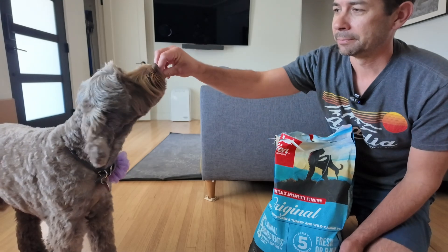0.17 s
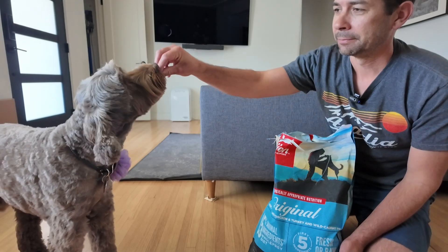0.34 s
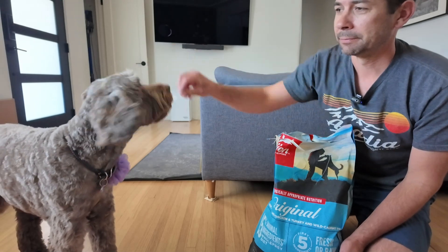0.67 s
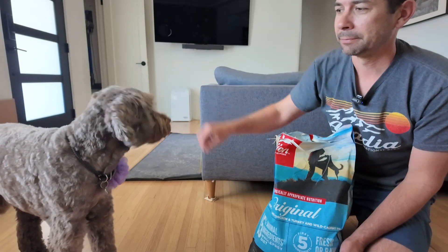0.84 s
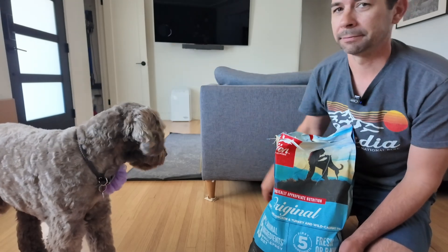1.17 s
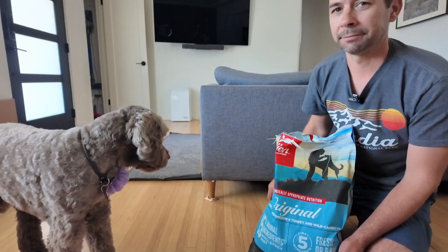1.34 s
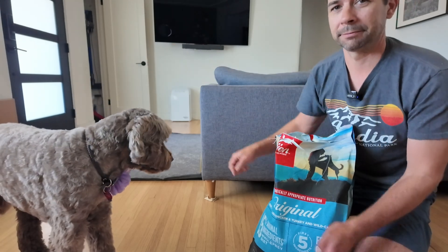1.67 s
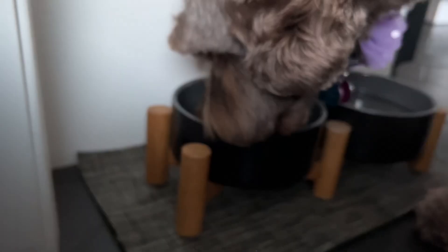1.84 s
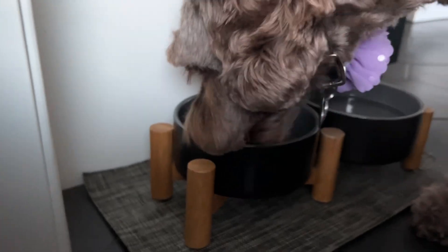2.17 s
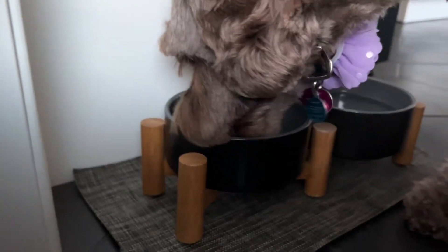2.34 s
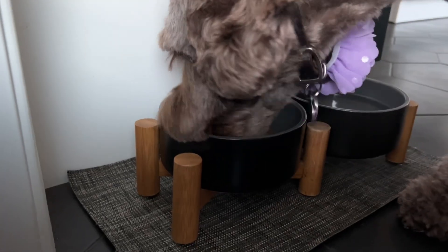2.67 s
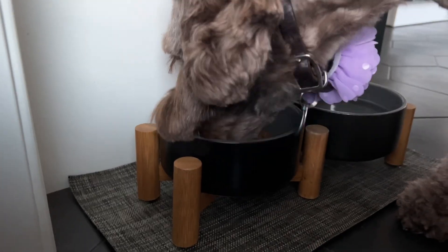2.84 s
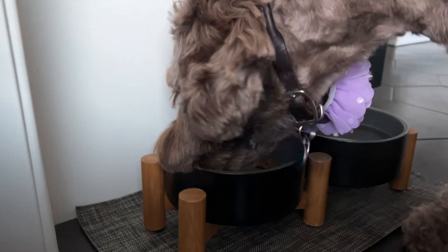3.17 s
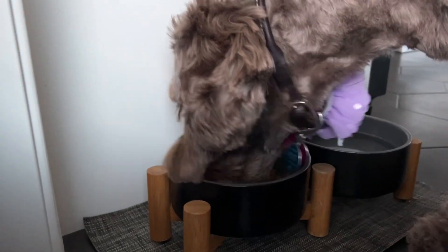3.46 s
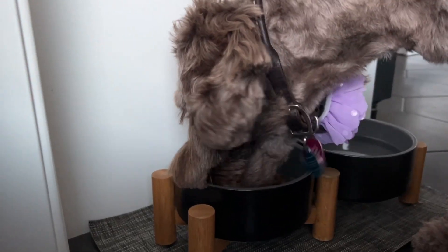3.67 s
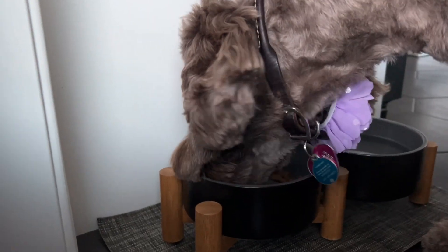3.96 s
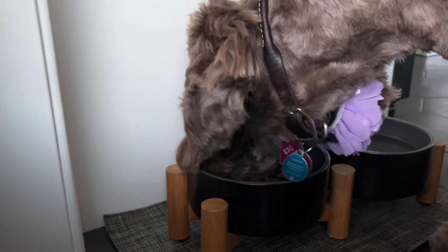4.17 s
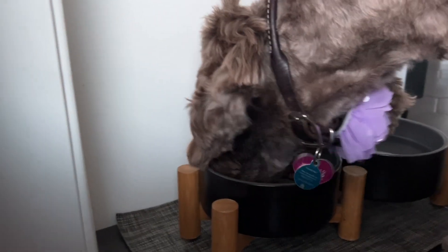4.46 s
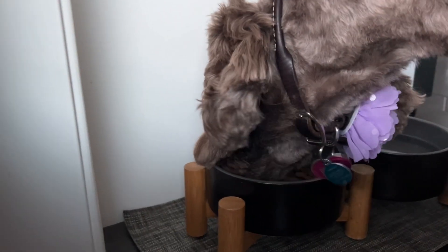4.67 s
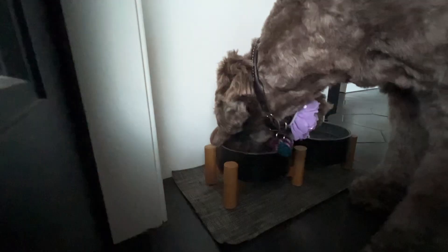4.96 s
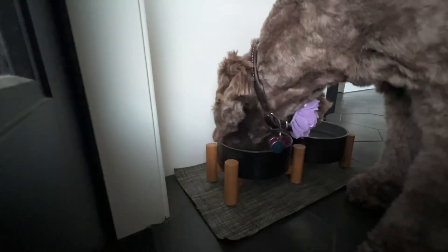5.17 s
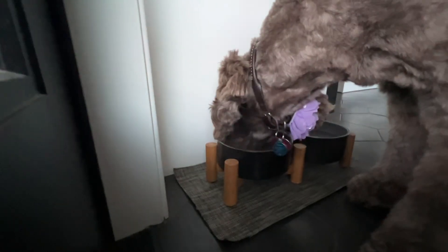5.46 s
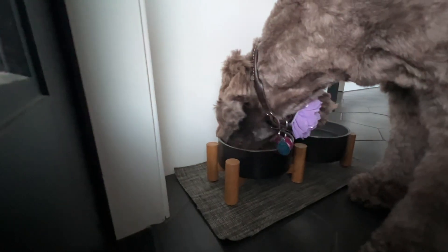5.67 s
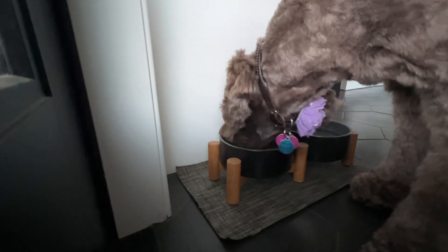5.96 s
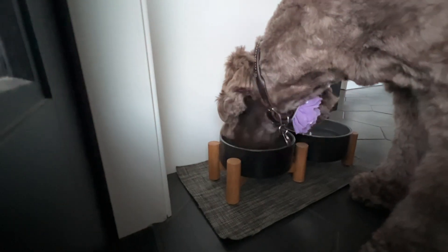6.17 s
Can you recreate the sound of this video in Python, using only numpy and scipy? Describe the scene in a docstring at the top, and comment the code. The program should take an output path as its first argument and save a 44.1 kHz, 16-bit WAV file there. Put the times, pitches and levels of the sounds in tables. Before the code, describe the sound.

A quiet living room in mono: soft ventilation, low hum, a slowly rising hiss and faint kibble cracks from a hand-fed dog. A small wooden knock, a brief dip, then a close stereo view of a bowl. Its stand bumps, kibble rustles and crunches, and metal tags clink brightly on the rim, densest in the middle, sparser later over a low wavering drone.

```python
"""In a quiet living room, in mono, a dog cracks a piece of kibble from a hand over ventilation, hum and hiss.
A wooden knock follows, the sound dips briefly, and a two-port microphone then hears a bowl on its stand close by.
There metal collar tags clink, chatter and slide on the rim: contact noise wakes decaying metal modes.
Kibble cracks in bursts of splinters and rustles under the muzzle; the stand is bumped as damped wood modes.
Below lie an indoor rumble of shaped noise and, from about three fifths of the way on, a wavering two-tone drone."""
import sys
import numpy as np
from scipy import signal
from scipy.fft import rfft, irfft
from scipy.io import wavfile
from scipy.ndimage import uniform_filter1d

SR = 44100
rng = np.random.default_rng(int(sys.argv[2]) if len(sys.argv) > 2 else 0)


def unload_audio(sound):
    """Save the sound as a 16-bit wav file, at the path given as the first command line argument."""
    columns = np.transpose(np.atleast_2d(sound))
    # keep every value between -1 and 1, then stretch to whole-number steps
    steps = np.round(np.clip(columns, -1, 1) * 32767)
    wavfile.write(sys.argv[1], SR, steps.astype(np.int16))


N = 277962
T = np.arange(N) / SR
FREQS = np.fft.rfftfreq(N, 1 / SR)

# All levels are relative: each layer sets its own gain on top.
# tags strike: [t/s, force/dB, squareness on the rim/0-1, squareness on the other tag/0-1, contact tick/dB]
TAG_STRIKES = [(2.17, -35.5, 0.26, 0.76, -27), (2.313, -48, .1, .3, -46), (2.32, -48, 0, 0.6, -36),
               (2.4757, -49, .16, .1, -43), (2.513, -67, .6, 0, -54), (2.534, -34.5, 0.62, 0, -24),
               (2.616, -45.5, .1, 0.81, -30), (2.734, -57, .1, 0, -39), (2.751, -47, .12, 0.77, -35),
               (2.8194, -31, 0, 0.78, -20), (2.828, -31, 0.3, 0.1, -29), (2.96, -31, 0.2, 0.71, -26),
               (3.128, -24.5, 0.1, 0, -25), (3.161, -54, 0, 0, -48), (3.203, -51, 0, 0, -39),
               (3.29, -40, .1, 0.73, -30), (3.315, -22.5, 0, 0.68, -27.5), (3.4275, -16.5, 0.1, 0.5, -21.5),
               (3.439, -30, .08, 0.8, -25.5), (3.6026, -37.5, 0.56, 0.68, -27.5),
               (3.627, -57, .2, 0.7, -46), (3.6745, -43, .16, 0.64, -52), (3.74, -43.5, .11, 0.02, -51),
               (3.78, -45, 0.3, 0.79, -42), (3.847, -35, 0.75, 0.4, -36), (3.862, -40.5, 0.63, 0.2, -36),
               (4.0297, -24, 0.4, 0.47, -23), (4.065, -22.5, 0.82, .2, -21), (4.0907, -25, 0.3, .35, -28),
               (4.12, -27, .2, 0.68, -28), (4.153, -42, .2, 0.14, -35), (4.203, -32, 0.63, .05, -30),
               (4.236, -34, .13, .62, -30), (4.262, -25.5, 0.3, 0.68, -19), (4.278, -60, 0.64, .4, -36),
               (4.2946, -39.5, 0.25, 0.7, -39), (4.346, -44.5, 0.75, 0.3, -33),
               (4.395, -46.5, 0, 0.74, -44), (4.434, -55, .1, 0.7, -42), (4.481, -20, 0.34, 0, -18),
               (4.488, -28.5, 0.68, 0.2, -32), (4.6005, -19, 0.51, 0.82, -14.5),
               (4.6887, -25, 0.3, 0.83, -25), (4.7077, -23, 0.1, 0.69, -28), (4.7485, -38.5, 0, 0.7, -34),
               (4.84, -49, 0.05, .2, -48), (4.946, -57.5, 0, 0.2, -43), (4.964, -32, 0.82, .4, -15.5),
               (5.0377, -26.5, 0.75, 0.53, -16.5), (5.106, -29.5, 0.78, 0.94, -20.5),
               (5.335, -21.5, 0.72, 0, -16), (5.653, -40.5, .5, 0.2, -38), (5.661, -43.5, 1, 0.88, -37),
               (5.686, -44.5, 0.98, 0.3, -52), (5.751, -51, 0.2, .5, -46), (5.856, -50.5, .97, 0.8, -37),
               (5.871, -56.5, 0.94, .51, -50), (5.948, -59, 0.1, 0.35, -61.5),
               (6.029, -51.5, 0, 0.26, -59.5), (6.068, -38.5, 0.98, 0.12, -41),
               (6.124, -35, 0.48, 1, -27.5)]
# spectrum of the hard contact itself: [f/Hz, level/dB]
CONTACT_COLOUR = [(1000, -20), (3000, -16.5), (6000, -31), (8300, -12), (10200, -13.5), (12000, -23.5),
                  (14000, -5.5), (15400, -13), (16000, -20)]
# modes of bowl and tags, before the fur damps them: [f/Hz, level/dB, t60/s]
LOWEST_RING = [(3016, -1, .26), (3042, -8, .17), (3125, -12, .12), (3494, -18, .12)]
BOWL_RING = [(4931, -4.5, .22), (5560, -24, .12), (6368, -22, .17), (7233, -1, .27), (7962, -12, .24),
             (8350, -19, .14), (8597, -27, .18), (9033, -15, .16), (9295, -8, .16), (9930, -8, .12),
             (10008, -4, .24), (10745, -12, .14), (12935, -7, .14), (13034, -11, .15)]
TAG_BEND = [(4200, -24, .12), (4490, -18, .27)]
TAG_RING = [(6440, -30, .12), (7295, -8, .06), (7333, 0, .11), (7975, -15, .15)]
EDGE_PING = [(11350, -9, .025), (11610, -5, .035), (11717, 0, .045), (11825, -8, .06), (11960, -8, .05),
             (12441, -14, .12), (15560, -13, .03)]
# the many weak modes of tags, ring and buckle: [f/Hz, level/dB]
SHIMMER = [(3000, -11), (6000, -6), (7500, -12), (9700, -3), (10600, -10), (12200, -10.5), (13500, -11),
           (15300, -12), (16000, -22)]
# a tag slides along the rim: [t/s, length/s, level/dB, its lowest ring relative to the rest/dB]
RIM_SLIDES = [(1.967, 0.033, -52.5, -16), (2.18, 0.016, -51.5, 1), (2.215, 0.015, -55.5, 2),
              (2.267, 0.026, -56.5, -5.5), (2.467, 0.025, -56, 9), (2.509, 0.05, -42, 0.5),
              (2.572, 0.041, -58, 11.5), (2.629, 0.035, -51, 3.5), (2.319, 0.047, -69, -1),
              (2.68, 0.079, -68, -4), (2.835, 0.061, -61, 3.5), (2.884, 0.03, -50, 0.5),
              (3.486, 0.034, -44, -5.5), (3.638, 0.023, -55.5, -13), (3.787, 0.031, -52, 0),
              (3.953, 0.034, -54.5, 1), (4.2, 0.13, -54.5, 7), (5.353, .1, -68, 5), (5.473, 0.16, -57.5, 1),
              (5.65, 0.061, -45, 0), (5.745, 0.074, -59, 1), (6.072, .09, -62, 16.5),
              (6.167, 0.048, -51.5, 8), (6.225, 0.04, -63, 4)]
# low and high modes of the sliding tag, damped by the contact: [f/Hz, level/dB, t60/s]
SLIDE_LOW_MODES = [(3015, 0, .14), (3130, -5, .05), (3520, -10, .05)]
SLIDE_HIGH_MODES = [(4931, -24, .1), (5167, 0, .075), (7120, -12, .06), (7325, -16, .09), (9295, -17, .07),
                    (12440, -20, .05)]
# spectrum of the scrape on the rim and of the hiss at the bowl: [f/Hz, level/dB]
HISS_COLOUR = [(1500, -16), (3000, 26.5), (6000, 15), (9000, 15.5), (12500, 1), (16000, -3)]
# the dog cracks the piece from the hand: [t/s, level/dB, f/Hz]
BITE_CRACKS = [(.062, -63.5, 3780), (.076, -63, 3660), (.096, -57.5, 3490), (.274, -53, 3400),
               (.381, -60, 2640), (.448, -55.5, 2980), (.458, -59, 3320), (.535, -56, 2830),
               (.635, -60, 7550), (.698, -58, 7450), (.707, -56, 7400), (.816, -54, 3000),
               (.835, -55, 2840), (1.0015, -46, 3540), (1.091, -44.5, 2800), (1.138, -49.5, 2250),
               (1.177, -58, 2360), (1.354, -59, 3580), (1.379, -47.5, 2740), (1.403, -51, 2730),
               (1.541, -48.5, 1980), (1.6556, -46.5, 7500)]
# kibble crushed and shoved in the bowl: [t/s, level/dB, f/Hz]
BOWL_CRUNCHES = [(2.093, -51, 2400), (2.141, -37.5, 2150), (2.227, -47, 2950), (2.433, -43, 1020),
                 (2.642, -46, 1050), (3.063, -46, 864), (3.177, -40, 2610), (3.446, -44.5, 2600),
                 (3.545, -51, 1740), (3.746, -49, 1130), (4.19, -40, 820), (5.484, -46.5, 3020),
                 (5.684, -38.5, 3320), (6.174, -35.5, 2870)]
# dull knocks on wood: [t/s, clack/dB, thud/dB, brightness/dB per octave, highest excited f/Hz]
WOOD_KNOCKS = [(1.6262, -31, -81, 8, 1700), (2.032, -16.5, -17.5, 7, 15000), (3.234, -23.5, -43.5, 7, 9000),
               (4.326, -25.5, -30.5, 3.5, 9000)]
# modes of the wooden clack: [f/Hz, level/dB, t60/s]
WOOD_MODES = [(326, 2, 0.046), (435, -14, 0.017), (625, 7, 0.018), (770, 12, 0.0058), (1043, -0.5, 0.0098),
              (1382, -12.5, 0.022), (1820, 7.5, 0.0042), (3950, -17.5, 0.0058), (7160, -35, 0.0038),
              (12380, -16, 0.0012)]
# modes of the heavy, low part of a knock: [f/Hz, level/dB, t60/s]
THUD_MODES = [(61.4, 2, 0.082), (84, 5.5, 0.073), (121, -1, 0.086), (155, -4, 0.06), (241.5, -3, 0.0579)]
# background beside the bowl: [t/s, rumble/dB, rustle/dB]
BOWL_LEVELS = [(1.9, -46, -56), (2.14, -43, -59), (2.54, -46, -58.5), (2.6, -62, -57), (2.82, -44.5, -56.5),
               (3.2, -45, -56), (3.32, -52, -54.5), (3.72, -52.5, -56), (3.88, -43.5, -53.5),
               (4.6, -43.5, -53.5), (5.7, -44, -51.5), (5.93, -41, -49.5), (6.3, -46.5, -52.5)]
# spectra of the indoor rumble and of the rustling kibble: [f/Hz, level/dB]
RUMBLE_COLOUR = [(15, -19), (25, -10), (54, 1.5), (102, -0.5), (116, 1.5), (141, -7.5), (189, -12),
                 (283, -7.5), (316, -29), (354, -10), (395, -35.5), (430, -12.5), (522, -24), (600, -34),
                 (700, -25), (910, -32.5), (1540, -120)]
RUSTLE_COLOUR = [(150, 0.5), (260, 8), (400, 4), (520, -4.5), (650, 1), (900, -12), (1150, -4.5),
                 (1700, -9), (2400, -18), (4000, -50), (9000, -49)]
# an appliance drones on two tones: [low tone f/Hz, high tone f/Hz]
DRONE_TONES_HZ = (64.9, 101.3)
# levels of the drone: [t/s, low tone/dB, high tone/dB]
DRONE_LEVELS = [(3.78, -80, -80), (3.88, -41.5, -70), (4.3, -50.5, -60), (4.9, -48, -56.5),
                (5.201, -43.5, -47.5), (5.65, -46.5, -46.5), (5.95, -44, -36.5), (6.05, -56.5, -47.5),
                (6.3, -52, -44.5)]
# background in the living room: [t/s, ventilation/dB, hiss/dB]
LOUNGE_LEVELS = [(0, -59.5, -84.5), (.6, -59, -74), (1.0, -58.5, -67), (1.6, -57.5, -64.5),
                 (1.84, -57, -70)]
# spectra of the ventilation and of the hiss in the living room: [f/Hz, level/dB]
VENTILATION_COLOUR = [(30, -13), (80, -5), (130, -2.5), (190, -4.5), (300, 3.5), (420, 2), (620, 2),
                      (900, -8.5), (1400, -17.5), (2200, -26), (5000, -36)]
LOUNGE_HISS_COLOUR = [(710, 1.5), (1200, 8), (1800, -9), (2200, 0.5), (3400, -4), (4200, -4.5),
                      (5500, -6.5), (6150, -1.5), (7800, -5.5), (10800, -13), (14500, -25), (16000, -28)]
# a near source at the two microphone ports: [f/Hz, left minus right/dB, phase by which left leads/rad]
MIC_PORTS = [(100, -1.5, .5), (571.6, 5.5, 1.26), (1510, 0.5, 1.5), (3070, -.5, 2.5), (4240, 4, 1),
             (4930, 7.5, -1.2), (5560, 8.5, -.6), (7250, 3, -.1), (8460, -1, -1.3), (9700, 0, -3.1),
             (11700, 0, -4.65), (12700, 0, -5.4), (15500, 0, -8.4)]
# how much of the background differs between the ports: [f/Hz, side minus mid/dB]
STEREO_WIDTH = [(60, -23), (125, -13.5), (250, -7.5), (500, -4.5), (1500, 0.5), (8000, -0.5)]

MOVE_S = 1.872  # from the living room to the bowl
NOSING_START_S, NOSING_END_S = 2.15, 4.85  # the dog roots about, and the tags dangle against the rim
RIM_DB, RIM_RANGE_DB = 6, 51.5  # bowl ring after a square blow, and how much a glancing one loses
TAG_DB, TAG_RANGE_DB = 10, 51  # the same for one tag on the other
BEND_DB, BEND_SLOPE = -21, .8  # ring level at which a tag bends fully; extra dB lost per dB below it
RATTLE_T60_S = .13  # how long the small contacts go on after a strike
FREE_RING = 1.2  # longer ring once the rooting has stopped and the tags hang clear of the fur
HUM_HZ, HUM_DB = 118.2, -61
ROOM_T60_S = 0.19
TOP_HZ = 16100  # upper limit of the recorder


def clinks(tag_db=1.0, edge_db=2, shimmer_db=-10.0, contact_db=6, contact_t60=0.012, rise_s=0.00039,
           bounce_s=0.0056, rebound_db=-11, choked=0.55, rattle_db=-22, rattle_ring_db=-3):
    """Each strike ticks, rings the metal, rebounds once and dies away in a rattle of tiny contacts."""
    rings, ticks, rattle = np.zeros((3, N))
    t, after = T[:SR // 20], T[:SR // 5]
    crowd = weak_modes(count=260, t60=0.22)
    tick = fade(t, contact_t60) * (1 - np.exp(-t / rise_s))
    for s, db, on_rim, on_tag, tick_db in TAG_STRIKES:
        bowl = db + RIM_DB - RIM_RANGE_DB * (1 - on_rim)
        tag = db + TAG_DB - TAG_RANGE_DB * (1 - on_tag)
        # only the hardest blows bend the tag enough to wake its low modes fully
        bend = tag + BEND_SLOPE * min(tag - BEND_DB, 0)
        add(rings, s, undb(bend + tag_db) * jingle(TAG_BEND, 0.71))
        # after a square hit on the bowl a tag swings clear; after a glancing one the fur chokes it
        hold = np.interp(on_rim, [.25, .73], [choked, 1])
        if s > NOSING_END_S:
            hold *= FREE_RING
        add(ticks, s, undb(tick_db) * rng.standard_normal(len(t)) * tick)
        add(rings, s, undb(bowl) * jingle(LOWEST_RING, hold))
        add(rings, s, undb(bowl) * jingle(BOWL_RING, hold))
        add(rings, s, undb(tag + tag_db) * jingle(TAG_RING, hold))
        add(rings, s, undb(db + edge_db) * jingle(EDGE_PING, hold))
        # the crowd of weak modes follows the lasting rings; a mere edge ping hardly wakes it
        force = np.linalg.norm(undb([bowl, bowl, tag, db]) * [0.462, 0.24, 0.139, 0.027])
        mixture = rng.standard_normal(len(crowd)) @ crowd
        add(rings, s, force * undb(shimmer_db) * mixture)
        # the light rebound only wakes the short, high modes
        again = s + bounce_s * rng.uniform(0.71, 1.2)
        add(rings, again, undb(db + rebound_db) * jingle(EDGE_PING, hold))
        add(ticks, again, undb(tick_db + rebound_db) * rng.standard_normal(len(t)) * tick)
        # tags, ring and buckle go on jostling each other
        jostle = unit(grains(len(after), 420, 4.5)) * fade(after, RATTLE_T60_S)
        add(rattle, s, undb(rattle_db) * np.hypot(undb(tick_db), undb(bowl + 3)) * jostle)
    rings += undb(rattle_ring_db) * sing(rattle, crowd.sum(axis=0))
    return rings + undb(contact_db) * colour(ticks + rattle, CONTACT_COLOUR)


def jingle(modes, hold, scatter_db=4.5, bloom_cycles=8, free_share=0.32, grip=0.48, twirl=0.85, twirl_hz=32):
    """Struck swinging metal: modes build up, lose much to the contact, then ring on as the tag twirls."""
    hz, db, t60 = np.transpose(modes)[:, :, None]
    t = T[:SR // 4]
    size, detune, pace, angle = rng.standard_normal((4, len(modes), 1))
    # the point of contact loads each mode, so its pitch and weight differ from blow to blow
    hz = hz * (1 + .0011 * detune)
    weight = undb(db + scatter_db * size)
    decay = (1 - free_share) * fade(t, t60 * hold * grip) + free_share * fade(t, t60 * hold)
    bloom = 1 - np.exp(-hz * t / bloom_cycles)
    facing = 1 + twirl * np.sin(2 * np.pi * twirl_hz * 2 ** (pace / 2) * t + np.pi * angle)
    return np.sum(weight * bloom * decay * facing * np.sin(2 * np.pi * hz * t), axis=0)


def weak_modes(count, t60):
    """A crowd of faint, unrelated metal modes, one a row."""
    hz = rng.uniform(SHIMMER[0][0], SHIMMER[-1][0], (count, 1))
    t = T[:SR // 3]
    return undb(at(SHIMMER, hz)) * fade(t, t60) * np.sin(2 * np.pi * hz * t) / np.sqrt(count)


def slides(scrape_db=-23, chatter_db=-10):
    """A tag skips along the rim in small, uneven contacts that tick and keep the metal singing."""
    rub, low_rub = np.zeros((2, N))
    for s, length, db, low_db in RIM_SLIDES:
        size = int(length * SR)
        skips = undb(db) * unit(grains(size, 550, 4.0)) * signal.windows.tukey(size, .3)
        add(rub, s, skips)
        add(low_rub, s, undb(low_db) * skips)
    singing = sing(rub, ring(SLIDE_HIGH_MODES)) + sing(low_rub, ring(SLIDE_LOW_MODES))
    scrape = undb(scrape_db) * colour(rub, HISS_COLOUR)
    chatter = undb(chatter_db) * colour(rub, CONTACT_COLOUR)
    return singing + scrape + chatter


def kibble():
    """Kibble breaks under the muzzle in the bowl, heard at both ports with the room's answer."""
    nosing = (NOSING_START_S, NOSING_END_S)
    crushed = BOWL_CRUNCHES + crumbs(nosing, db=-59.5, low_hz=1200, high_hz=4520, count=8)
    dry_cracks = cracks(crushed, t60_at_1khz=0.06, rate=2000, sharpness=4.6, snap_db=14.5)
    return undb(-5.0) * place(dry_cracks, wet_db=-3.5)


def bites():
    """The piece from the hand breaks in the mouth, heard at the left port only."""
    chewed = BITE_CRACKS + crumbs((.7, 1.48), db=-61.0, low_hz=1970, high_hz=3760, count=26)
    dry_cracks = cracks(chewed, t60_at_1khz=0.046, rate=1100, sharpness=5, snap_db=10)
    return undb(-13.5) * place(dry_cracks, wet_db=-14.0)[0]


def cracks(table, t60_at_1khz, rate, sharpness, snap_db):
    """A brittle piece snaps, then splinters in a fading burst through one resonance; low ones last longer."""
    out, t = np.zeros(N), T[:SR // 6]
    for s, db, hz in table:
        burst = unit(grains(len(t), rate, 3.24)) * fade(t, t60_at_1khz / np.sqrt(hz / 1000))
        burst[0] += undb(snap_db)
        sound = signal.lfilter(*signal.iirpeak(hz, sharpness, fs=SR), burst)
        onset_rms = np.sqrt(np.mean(sound[:SR // 100] ** 2))
        add(out, s, undb(db) * sound / onset_rms)
    return out


def crumbs(span, db, low_hz, high_hz, count):
    """Faint cracks between the loud ones: [t/s, level/dB, f/Hz]."""
    events = strays(span, db, spread_db=5, count=count)
    return [(s, level_db, low_hz * (high_hz / low_hz) ** trait) for s, level_db, trait in events]


def strays(span, db, spread_db, count):
    """Small events, one at random in each equal slot of a span: [t/s, level/dB, trait/0-1]."""
    when, size, trait = rng.random((count, 3)).T
    s = span[0] + (span[1] - span[0]) * (np.arange(count) + when) / count
    return np.c_[s, db + spread_db * (2 * size - 1), trait]


def knocks(clack_gain_db=-6, thud_gain_db=7, push_s=0.0011, swell_s=0.013, rattle_db=-1, rattle_t60=0.015):
    """Wood clacks and briefly rattles under a short, soft push; the heavy low thud builds a moment later."""
    out = np.zeros(N)
    thud = ring(THUD_MODES)
    t = T[:len(thud)]
    band = signal.butter(2, [250, 2000], "band", fs=SR, output="sos")
    for s, clack_db, thud_db, tilt_db, top_hz in WOOD_KNOCKS:
        clack = ring([(hz, db + tilt_db * np.log2(hz / 700), t60) for hz, db, t60 in WOOD_MODES])
        noise = unit(signal.sosfilt(band, rng.standard_normal(len(t))))
        rattle = undb(rattle_db) * noise * fade(t, rattle_t60)
        pushed = (clack + rattle) * (1 - np.exp(-t / push_s))
        soft = signal.butter(6, top_hz, fs=SR, output="sos")
        add(out, s, undb(clack_db + clack_gain_db) * signal.sosfilt(soft, pushed))
        add(out, s, undb(thud_db + thud_gain_db) * thud * np.minimum(t / swell_s, 1) ** 2)
    return out


def corner(rumble_gain_db=-2.0, rustle_gain_db=-2.64, hiss_db=-18.0, pellets_db=-7.0, waver_db=3.0, lean_db=4.5):
    """Rumble and a wavering drone; the muzzle rustles through loose kibble, leaning to the left port."""
    rumble_db, rustle_db = curves(BOWL_LEVELS)
    rumble = undb(rumble_db + rumble_gain_db) * air(RUMBLE_COLOUR)
    rustle = undb(rustle_db + rustle_gain_db + 1.4 * walk(9.1)) * air(RUSTLE_COLOUR)
    tumble = undb(rustle_db + pellets_db + 1.8 * walk(15)) * pellets(count=1100)
    hiss = undb(rustle_db + hiss_db + 2 * walk(12.0)) * air(HISS_COLOUR)
    drone = np.zeros(N)
    for hz, db in zip(DRONE_TONES_HZ, curves(DRONE_LEVELS)):
        drone += undb(db + waver_db * walk(9.8)) * np.sin(2 * np.pi * hz * T + 0.37 * walk(8.3))
    lean = undb(np.array([[lean_db], [-lean_db]]) / 2)
    return rumble + drone + lean * (rustle + hiss) + place(tumble, wet_db=2.5)


def pellets(count, centre_hz=1350, spread_octaves=0.55, cycles=28):
    """Loose pieces tumble against each other, each a tiny damped knock with its own pitch."""
    out, t = np.zeros(N), T[:SR // 12]
    for when, pitch in zip(rng.uniform(0, T[-1], count), rng.standard_normal(count)):
        hz = centre_hz * 2 ** (spread_octaves * pitch)
        add(out, when, fade(t, cycles / hz) * np.sin(2 * np.pi * hz * t))
    return unit(out)


def living_room(ventilation_gain_db=-1):
    """Soft ventilation, a steady hum and a hiss that slowly rises, then eases."""
    ventilation_db, hiss_db = curves(LOUNGE_LEVELS)
    hum = undb(HUM_DB + 0.29 * walk(2.0)) * np.sin(2 * np.pi * HUM_HZ * T)
    ventilation = unit(colour(rng.standard_normal(N), VENTILATION_COLOUR))
    hiss = unit(colour(rng.standard_normal(N), LOUNGE_HISS_COLOUR))
    return hum + undb(ventilation_db + ventilation_gain_db) * ventilation + undb(hiss_db) * hiss


def air(points):
    """Diffuse noise: alike at both ports in the bass, less related in the treble."""
    mid = colour(rng.standard_normal(N), points)
    side = colour(unit(colour(rng.standard_normal(N), points)), STEREO_WIDTH)
    return unit(mid) + np.array([side, -side])


def place(x, wet_db):
    """A near source reaches the two ports with its own level and phase; the room answers."""
    hz, lean_db, lead = np.transpose(MIC_PORTS)
    # half of each difference goes to either port
    gain = undb(at(np.c_[hz, lean_db], FREQS) / 2)
    half = gain * np.exp(.5j * at(np.c_[hz, lead], FREQS))
    direct = irfft(rfft(x) * np.array([half, 1 / half]), N)
    t = T[:SR // 2]
    tail = rng.standard_normal((2, len(t))) * fade(t, ROOM_T60_S) * (t > .004)
    tail /= np.sqrt(np.sum(tail ** 2) / 2)
    return direct + undb(wet_db) * signal.fftconvolve(direct, tail, axes=1)[:, :N]


def ring(modes):
    """Modes that decay exponentially."""
    t = T[:SR // 3]
    return sum(undb(db) * fade(t, t60) * np.sin(2 * np.pi * hz * t) for hz, db, t60 in modes)


def sing(x, body):
    """Let contacts excite a ringing body."""
    return signal.fftconvolve(x, body / np.linalg.norm(body))[:N]


def grains(size, rate, spread_db):
    """Sparse clicks of very unequal strength, at a mean rate per second."""
    strength = undb(spread_db * np.minimum(rng.exponential(size=size), np.pi))
    clicks = (rng.random(size) < rate / SR) * rng.choice([-1, 1], size) * strength
    return clicks + 1e-9 * rng.standard_normal(size)  # never wholly silent, so it can be scaled


def walk(rate):
    """Slow random wander with rms 1, its steps at a rate in Hz."""
    k = int(SR / rate)
    steps = np.repeat(rng.standard_normal(N // k + 1), k)
    return unit(uniform_filter1d(uniform_filter1d(steps, k), k)[:N])


def colour(x, points):
    """Shape a sound by [f/Hz, level/dB] points."""
    return irfft(rfft(x) * undb(at(points, FREQS)), N)


def at(points, hz):
    """Read [f/Hz, value] points on a log-frequency axis."""
    f, value = np.transpose(points)
    return np.interp(np.log(np.maximum(hz, 1)), np.log(f), value)


def curves(table):
    """Each column of a table as a line through time."""
    s, *columns = np.transpose(table)
    return [np.interp(T, s, c) for c in columns]


def fade(t, t60):
    """Exponential decay by 60 dB in t60 seconds."""
    return np.exp(-np.log(1000) * t / t60)


def add(out, s, x):
    """Mix a short sound in at time s."""
    i = int(s * SR)
    out[i:i + len(x)] += x[:max(N - i, 0)]


def unit(x):
    """Scale to rms 1."""
    return x / np.sqrt(np.mean(x ** 2))


def undb(db):
    """Decibels to gain."""
    return 10 ** (np.asarray(db) / 20)


def scene():
    """The living room is heard in mono; after a short dip the bowl is heard in stereo."""
    before = np.clip((MOVE_S - T) / 0.074, 0, 1)
    after = np.clip((T - MOVE_S) / 0.016, 0, 1)
    # the wall and floor right behind the bowl throw some of the jingling back
    metal = place(clinks() + slides(), wet_db=-10)
    bumps = place(knocks(), wet_db=-18.0)
    lounge = living_room() + bites() + bumps[0]
    bowl = metal + kibble() + bumps + corner()
    return before * lounge + after * bowl


def record(dry):
    """The deepest bass is thinned out, and the recorder cuts the very top."""
    thinned = signal.sosfilt(signal.butter(4, 42, "high", fs=SR, output="sos"), dry)
    return signal.sosfilt(signal.ellip(8, .2, 70, TOP_HZ, fs=SR, output="sos"), thinned)


dry = scene()
out = record(dry)
unload_audio(out)
```